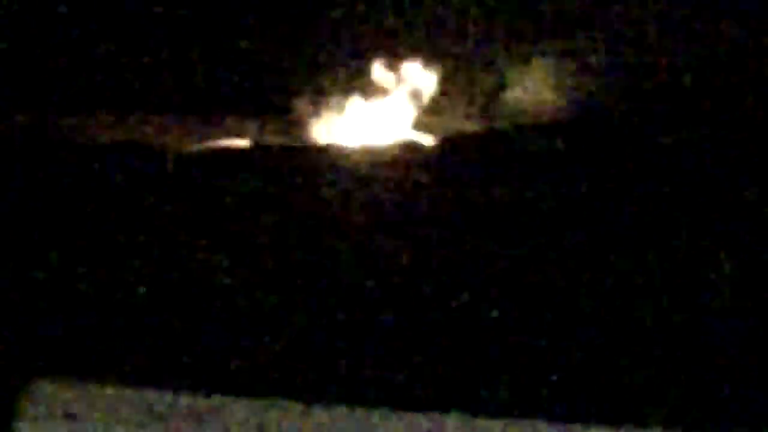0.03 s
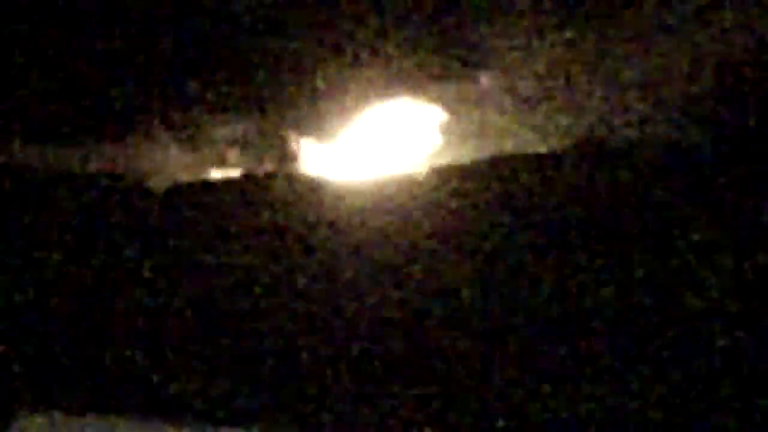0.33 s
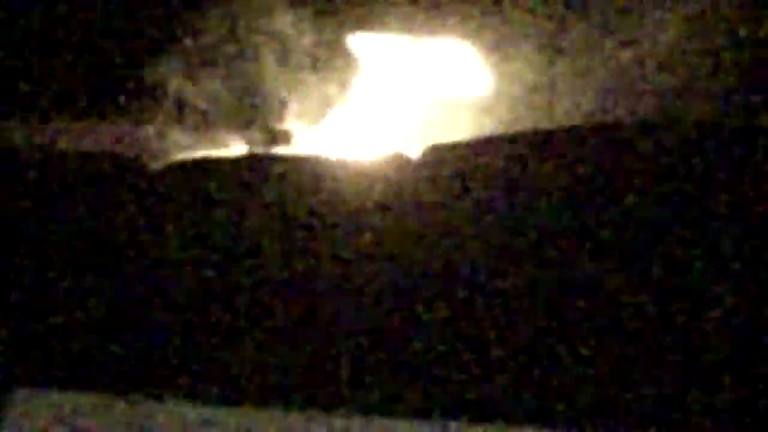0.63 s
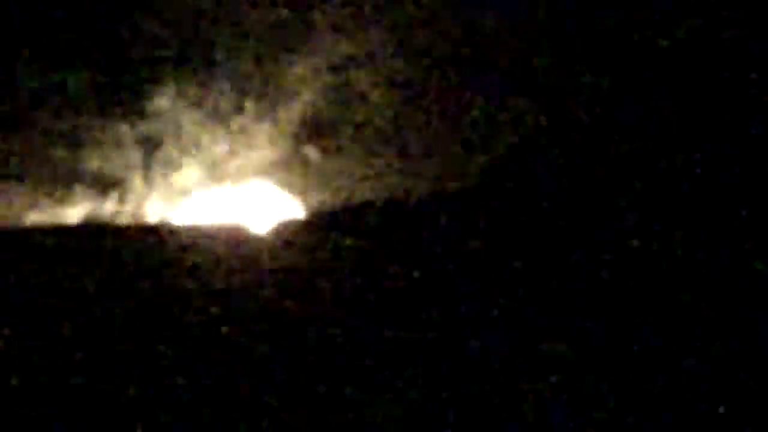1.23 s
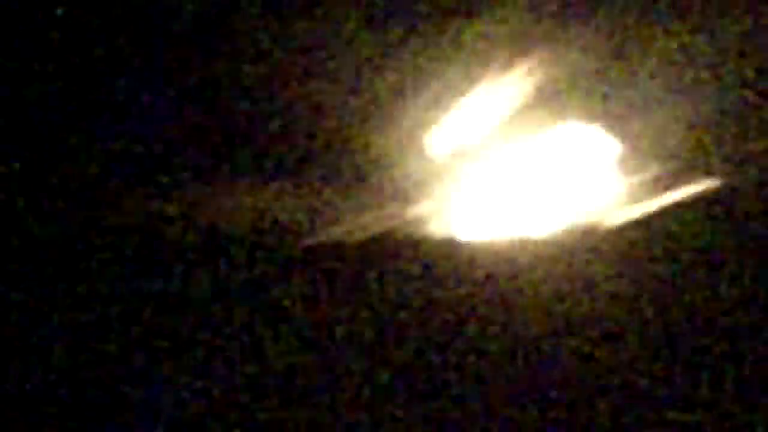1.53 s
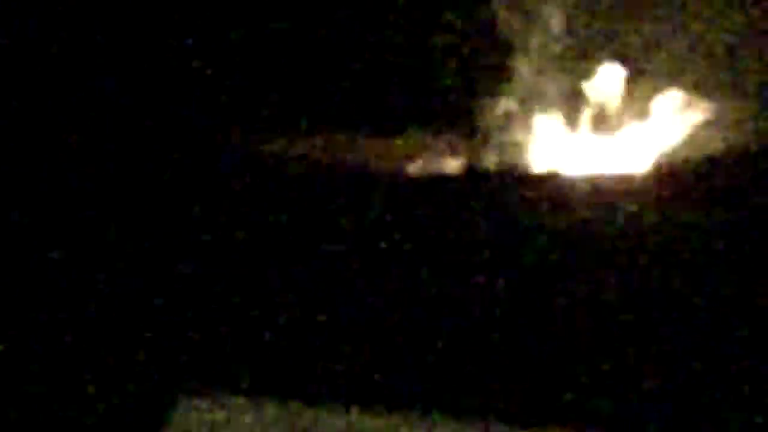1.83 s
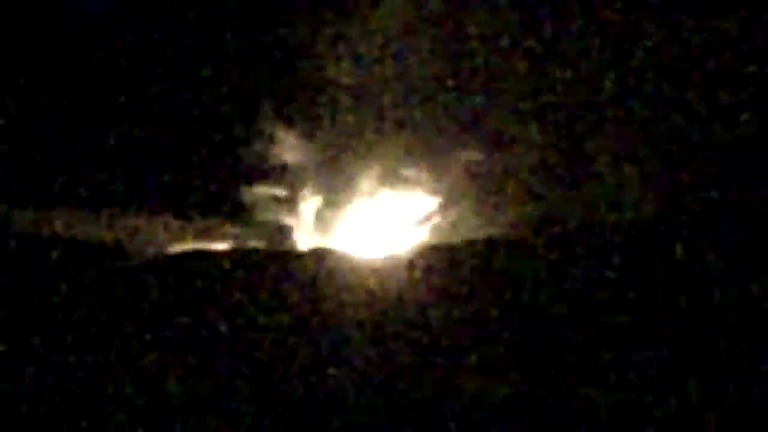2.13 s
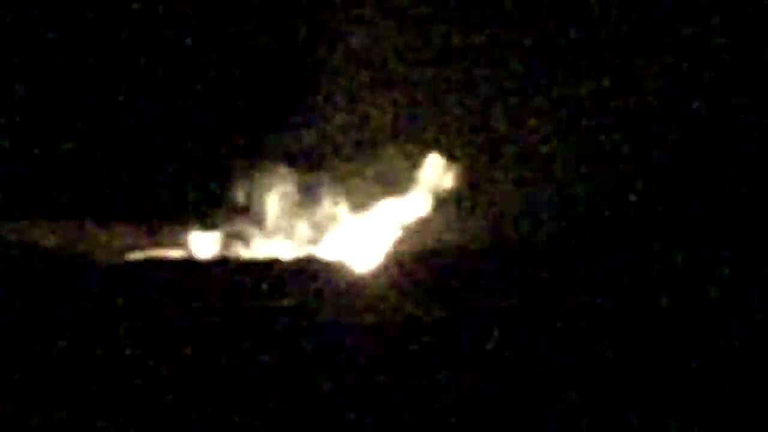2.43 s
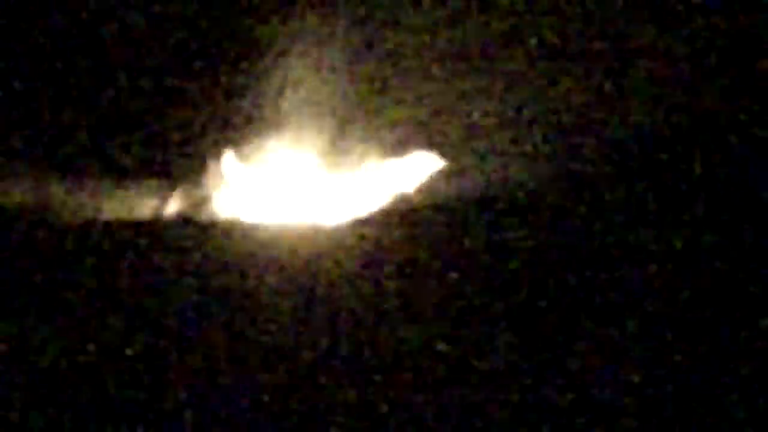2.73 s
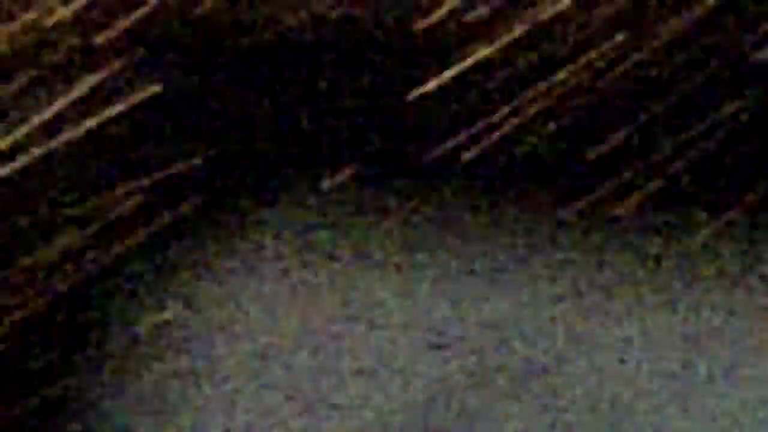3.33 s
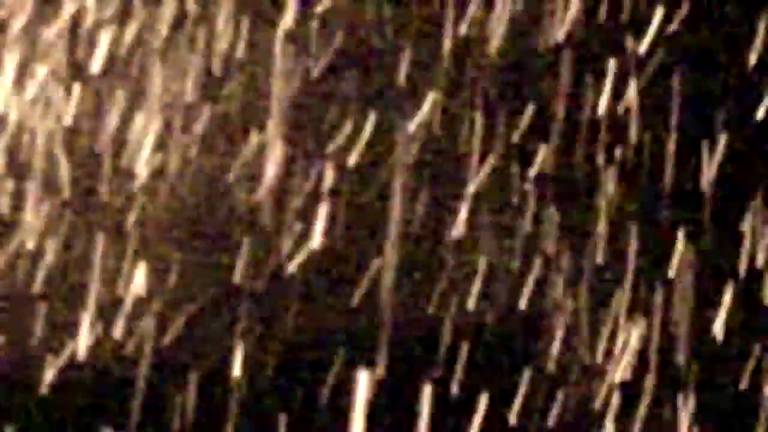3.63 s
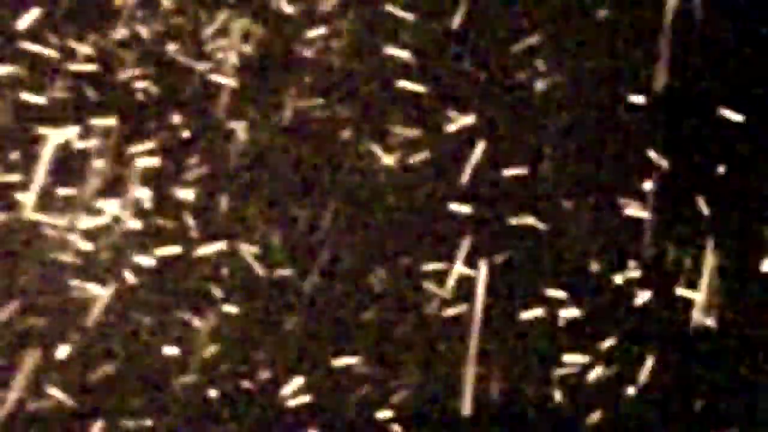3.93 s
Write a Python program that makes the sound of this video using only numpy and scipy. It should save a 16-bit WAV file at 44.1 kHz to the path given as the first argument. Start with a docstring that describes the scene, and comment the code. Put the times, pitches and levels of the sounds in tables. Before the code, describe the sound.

A can explodes in a small bonfire outdoors at night. Faint rumble and a few sharp ticks come first, then the bang overloads the microphone, echoes briefly, and gives way to a growing sizzle of falling embers.

```python
"""A faint rumble and a few sharp ticks from a small bonfire on a still night; a can lies in the fire.
The can bursts: shock wave, low boom, a jet of gas and coals, a wash of outdoor echoes.
The blast overloads the microphone. As the echoes die, scattered embers come down in a
growing sizzle of tiny impacts, with scuffs of falling debris."""
import sys
import numpy as np
from scipy import signal
from scipy.fft import rfft, irfft
from scipy.io import wavfile

SR = 44100
rng = np.random.default_rng(int(sys.argv[2]) if len(sys.argv) > 2 else 0)


def store_pcm(level_fs):
    """Save levels as 16-bit WAV."""
    pcm = np.round(np.clip(level_fs, -1, 1) * 32767).astype(np.int16)
    wavfile.write(sys.argv[1], SR, np.atleast_2d(pcm).T)


N = 176400
T = np.arange(N) / SR
BURST_S = 2.9005


def from_db(db):
    """Decibels to gain."""
    return 10 ** (np.asarray(db) / 20)


def rms_one(x):
    """Scale to unit rms."""
    return x / np.sqrt(np.mean(x ** 2) + 1e-20)


def level(points):
    """Gain over time from (time_s, level_db) points."""
    return from_db(np.interp(T, *np.transpose(points)))


def at_hz(points, hz):
    """Interpolate a table over log frequency."""
    freqs_hz, values = np.transpose(points)
    return np.interp(np.log(np.maximum(hz, 1)), np.log(freqs_hz), values)


def coloured(x, spectrum):
    """Shape x by a relative spectrum; rms 1."""
    hz = np.arange(N // 2 + 1) * SR / N
    gain = from_db(at_hz(spectrum, hz)) * (hz > 10)
    return rms_one(irfft(rfft(x) * gain, N))


def noise(spectrum):
    """Coloured noise; rms 1."""
    return coloured(rng.standard_normal(N), spectrum)


def band_noise(low_hz, high_hz):
    """Band-passed noise; rms 1."""
    edges_hz = np.clip([low_hz, high_hz], 10, SR / 2 - 100)
    sos = signal.butter(2, edges_hz, "band", fs=SR, output="sos")
    return rms_one(signal.sosfilt(sos, rng.standard_normal(N)))


def decay(start_s, t60_s):
    """Step to 1, then exponential decay to a -120 dB floor."""
    return (T >= start_s) * np.exp(-np.log(1000) * np.clip((T - start_s) / t60_s, 0, 2))


def ring(start_s, pitch_hz, t60_s):
    """Damped sine."""
    return decay(start_s, t60_s) * np.sin(2 * np.pi * pitch_hz * (T - start_s))


def swish(start_s, level_db, centre_hz, width_hz, length_s, attack_s=0.0021):
    """Short rush of band noise: attack, hold, release."""
    age_s = np.maximum(T - start_s, 0)
    envelope = (1 - np.exp(-age_s / attack_s)) / (1 + (age_s / length_s) ** 6)
    low_hz = np.hypot(centre_hz, width_hz / 2) - width_hz / 2
    return from_db(level_db) * envelope * band_noise(low_hz, low_hz + width_hz)


def grains(per_s, spread_db):
    """Random clicks of uneven size."""
    sizes = from_db(spread_db * np.minimum(rng.exponential(1, N), 5))
    signs = rng.choice([-1, 1], N)
    return sizes * signs * (rng.random(N) < per_s / SR)


def flicker(spread_db, rate_hz=70):
    """Fast random gain wander."""
    steps = rng.standard_normal(2000)
    return from_db(spread_db * np.interp(T * rate_hz, np.arange(len(steps)), steps))


def night_air():
    """Faint steady background noise."""
    # freq_hz, density_db
    spectrum = [(59, -26), (100, -4), (158, -7.5), (182, -7.5), (353, -12), (592, -15.5), (1500, -20),
                (1660, -23), (9450, -30.5), (10500, -28), (14000, -83)]
    return from_db(-63) * noise(spectrum)


def rumble():
    """Low noise that swells, sinks and swells again."""
    # time_s, level_db
    levels = [(0, -62.5), (1.5, -60.5), (1.78, -52), (2.05, -53), (2.35, -61), (2.75, -62), (2.87, -49.5),
              (4.0, -50)]
    # freq_hz, density_db
    spectrum = [(15, -7.5), (28, 3), (50, 1.5), (80, -1.5), (150, -27.5), (400, -59)]
    return level(levels) * noise(spectrum)


def hiss(centre_hz=1530, width_hz=220):
    """Faint narrow hiss that comes and goes."""
    # start_s, level_db, length_s
    spells = [(0.055, -66, 0.19), (0.265, -74, 0.17), (.42, -67, .2), (0.662, -64.5, 0.15)]
    return sum(swish(start_s, level_db, centre_hz, width_hz, length_s)
               for start_s, level_db, length_s in spells)


def ticks():
    """Brief cracks, each with a very high ring."""
    # start_s, level_db, pitch_hz
    events = [(0.6088, -32, 9560), (0.7899, -37, 9360), (0.9355, -33.5, 9600), (3.353, -35.5, 9600),
              (3.95, -34, 10000)]
    # freq_hz, density_db
    crack_spectrum = [(500, -18), (1000, -0.5), (1900, -3), (3200, 3.5), (4200, -3.5), (7000, -4.5),
                      (9800, -9.5), (11000, -30), (12500, -18)]
    crack = from_db(-8) * noise(crack_spectrum)
    sound = np.zeros(N)
    for start_s, level_db, pitch_hz in events:
        tick = ring(start_s, pitch_hz, t60_s=0.015) + crack * decay(start_s, t60_s=0.011)
        sound += from_db(level_db) * tick
    return sound


def puffs():
    """Soft puffs by the fire."""
    # start_s, level_db, centre_hz, width_hz, length_s
    events = [(0.844, -59, 1990, 3000, .004), (0.899, -51.5, 277, 250, 0.0062),
              (1.11, -62.5, 1080, 500, .012), (1.138, -62.5, 1410, 400, 0.015),
              (1.682, -64.5, 1480, 400, 0.027), (1.788, -62.5, 700, 900, .01), (1.793, -50, 91, 70, 0.038),
              (1.934, -52, 240, 295, 0.0077), (2.508, -57.5, 89, 120, 0.017),
              (2.573, -56, 350, 400, 0.0073)]
    return sum(swish(*event) for event in events)


def shock(level_db=20, push_s=0.0049):
    """Overpressure with a torn front, falling into longer suction; direct, then reflected."""
    # delay_s, gain_db
    reflections = [(.0088, -1), (0.0251, -14), (0.03, -8), (.049, -14.5), (0.071, -25)]
    torn_front = from_db(-3.5) * band_noise(490, 2580)
    sound = np.zeros(N)
    for delay_s, gain_db in [(0, 0)] + reflections:
        arrival_s = BURST_S + delay_s
        age = np.clip((T - arrival_s) / push_s, 0, 20)
        pressure = (T >= arrival_s) * (1 - age) * np.exp(-age)
        sound += from_db(gain_db) * (pressure + torn_front * decay(arrival_s, t60_s=0.011))
    return from_db(level_db) * sound


def boom():
    """Low ringing after the shock."""
    # pitch_hz, level_db, t60_s
    modes = [(72.9, -1.5, .55), (123.8, 9.5, 0.053), (161.2, 1.5, 0.23), (223.2, -6, 0.49),
             (520, -31, 0.27)]
    return sum(from_db(level_db) * ring(BURST_S, pitch_hz, t60_s) for pitch_hz, level_db, t60_s in modes)


def echoes(build_s=0.024):
    """Diffuse echoes build, die band by band and leave a far, low roll."""
    # freq_hz, density_db
    wash_spectrum = [(25, -16), (70, -3), (105, -2.5), (160, 3), (260, -3), (380, -5), (520, -6),
                     (650, -13.5), (950, -10.5), (1800, -22.5), (3200, -23.5), (3900, -37), (9500, -35),
                     (11500, -47), (13000, -80)]
    # freq_hz, t60_s
    decay_times = [(40, 0.58), (160, 0.49), (500, 0.51), (2000, .5), (9000, 0.45)]
    # freq_hz, density_db
    far_spectrum = [(20, 6), (32, 9), (55, -12), (80, -1), (115, -4), (160, 3), (205, -1), (270, -12.5),
                    (500, -19), (1000, -22), (3000, -48)]
    edges_hz = np.geomspace(22, 16000, 29)
    centres_hz = np.sqrt(edges_hz[1:] * edges_hz[:-1])
    gains = from_db(at_hz(wash_spectrum, centres_hz)) * np.sqrt(np.diff(edges_hz))
    gains /= np.linalg.norm(gains)
    near_fade = from_db(9.5) * decay(BURST_S, t60_s=0.15)   # early energy from nearby surfaces
    wash = np.zeros(N)
    for low_hz, high_hz, centre_hz, gain in zip(edges_hz, edges_hz[1:], centres_hz, gains):
        fade = decay(BURST_S, at_hz(decay_times, centre_hz)) + near_fade
        wash += gain * fade * band_noise(low_hz, high_hz)
    far_roll = from_db(-26.5) * decay(BURST_S, t60_s=2.77) * noise(far_spectrum)
    build = np.clip((T - BURST_S) / build_s, 0, 1) ** 4
    return build * (from_db(9) * wash + far_roll)


def spray(delay_s=0.024):
    """Gas and coals jet out as the can splits: bright, short-lived noise."""
    # freq_hz, density_db
    spectrum = [(300, -28), (700, -7.5), (1100, -8), (1600, -11), (3000, -14), (4200, -23), (9500, -36),
                (11500, -38), (13000, -60)]
    return from_db(-3) * decay(BURST_S + delay_s, t60_s=0.24) * noise(spectrum)


def embers():
    """Thousands of tiny impacts: a high sizzle over a patchy rustle."""
    # time_s, level_db
    sizzle_levels = [(2.95, -62), (3.17, -56), (3.195, -43), (3.215, -43.5), (3.24, -45), (3.31, -53.5),
                     (3.46, -48), (3.49, -43.5), (3.57, -51), (3.61, -41.5), (3.665, -45), (3.70, -50.5),
                     (3.74, -47.5), (3.81, -45), (3.828, -38.5), (3.87, -44), (3.94, -40.5), (3.955, -37.5),
                     (4.0, -40.5)]
    rustle_levels = [(2.95, -71), (3.2, -43.5), (3.26, -32), (3.32, -41.5), (3.44, -44.5), (3.5, -42.5),
                     (3.61, -42.5), (3.68, -43), (3.712, -47), (3.78, -45), (3.81, -48.5), (3.845, -39.5),
                     (3.89, -47), (3.917, -35), (3.95, -40.5), (4.0, -39.5)]
    # freq_hz, density_db
    sizzle_spectrum = [(1500, -1.5), (3000, 0), (4500, 1), (6300, -1.5), (8500, 3.5), (10200, 2.5),
                       (11000, -5.5), (12000, -9), (12700, -51)]
    rustle_spectrum = [(150, -7), (400, -1), (700, -1.5), (1150, 3), (1750, -3), (2200, -3.5), (2500, -6.5),
                       (3250, 2.5), (3800, -19), (6000, -20)]
    # rustle bands: edge_hz
    edges_hz = [100, 500, 900, 1400, 2000, 2700, 7000]
    sparks = coloured(grains(per_s=7000, spread_db=1.5), sizzle_spectrum)
    sizzle = level(sizzle_levels) * flicker(spread_db=3.1) * sparks
    patter = np.zeros(N)
    for band_hz in zip(edges_hz, edges_hz[1:]):
        sos = signal.butter(2, band_hz, "band", fs=SR, output="sos")
        patter += flicker(spread_db=2.6) * signal.sosfilt(sos, grains(per_s=5700, spread_db=3))
    rustle = level(rustle_levels) * coloured(patter, rustle_spectrum)
    return (T > BURST_S) * (sizzle + rustle)


def scuffs():
    """Larger debris scuffs as it lands."""
    # start_s, level_db, centre_hz, width_hz, length_s
    events = [(3.225, -36.5, 2500, 1300, 0.029), (3.528, -39, 2600, 1390, 0.047),
              (3.591, -43, 1920, 202, 0.032), (3.642, -42.5, 1060, 268, 0.033),
              (3.649, -41.5, 600, 147, 0.069), (3.723, -41, 1270, 380, 0.023),
              (3.742, -49.5, 1390, 240, 0.059), (3.897, -40, 3000, 500, 0.023)]
    return sum(swish(*event) for event in events)


def scene():
    """Fire, blast and fallout, summed to mono."""
    fire = night_air() + rumble() + hiss() + ticks() + puffs()
    blast = shock() + boom() + echoes() + spray()
    return (fire + blast + embers() + scuffs())[None]


def record(dry, ceiling=0.68, hardness=12, shelf_hz=11460, shelf_db=-16.5, cutoff_hz=15800):
    """Hard input overload; top octave shelved down, then cut."""
    clipped = dry / (1 + np.abs(dry / ceiling) ** hardness) ** (1 / hardness)
    below_shelf = signal.sosfiltfilt(signal.butter(8, shelf_hz, fs=SR, output="sos"), clipped)
    shelved = below_shelf + from_db(shelf_db) * (clipped - below_shelf)
    return signal.sosfiltfilt(signal.ellip(8, 0.05, 60, cutoff_hz, fs=SR, output="sos"), shelved)


dry = scene()
out = record(dry)
store_pcm(out)
```